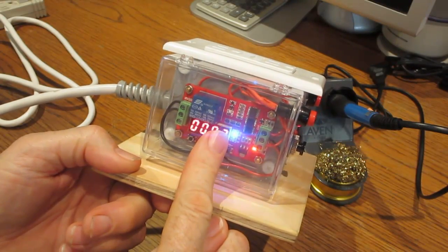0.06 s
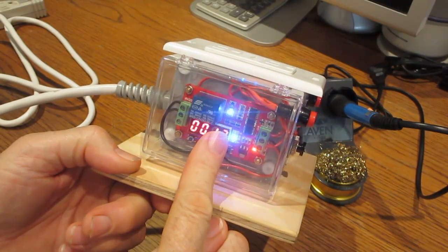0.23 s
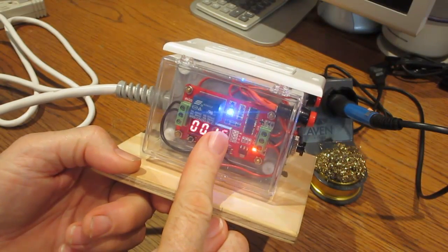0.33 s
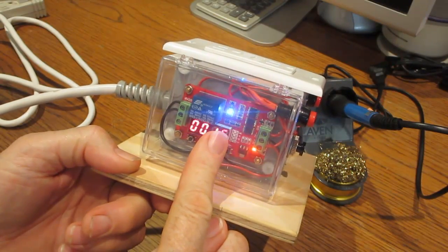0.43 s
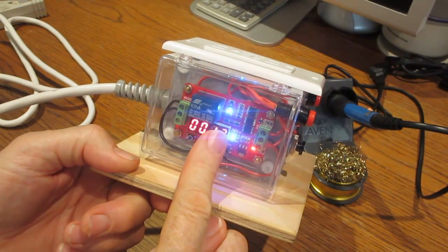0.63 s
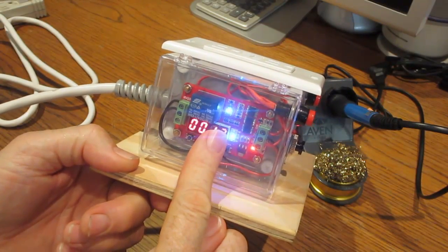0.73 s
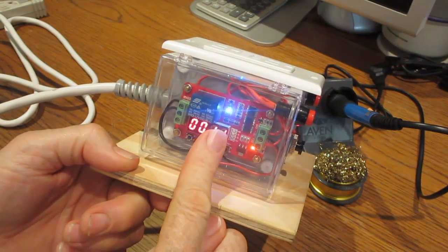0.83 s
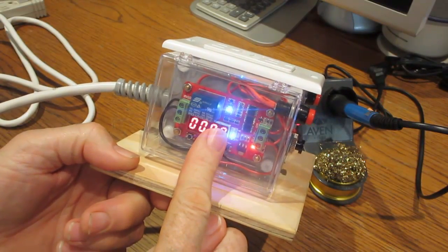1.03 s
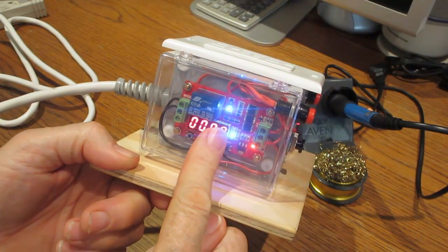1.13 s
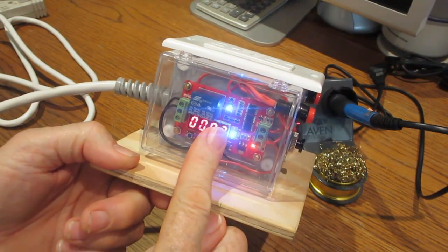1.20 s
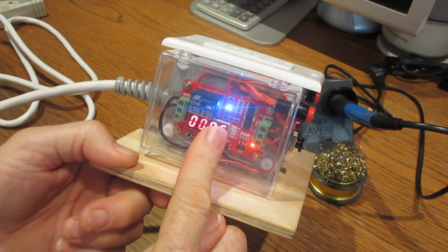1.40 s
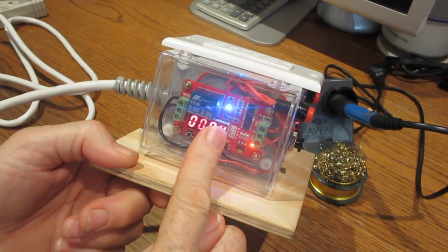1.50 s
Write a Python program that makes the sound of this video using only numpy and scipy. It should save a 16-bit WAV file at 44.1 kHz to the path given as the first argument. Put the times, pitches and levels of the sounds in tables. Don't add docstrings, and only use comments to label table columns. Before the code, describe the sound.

Single crisp relay click in a plastic box, close up, above quiet mains hum and fan air

```python
import sys
import numpy as np
from scipy import signal
from scipy.fft import rfft, irfft
from scipy.io import wavfile
from scipy.ndimage import uniform_filter1d

SR = 44100
rng = np.random.default_rng(int(sys.argv[2]) if len(sys.argv) > 2 else 0)


def voltage_ratio(level):
    return 10 ** (np.asarray(level, float) / 20)


def master(y):
    cut = np.clip(np.atleast_2d(y).T, -1, 1)
    pcm = np.round(cut * 32767)
    wavfile.write(sys.argv[1], SR, pcm.astype(np.int16))


N = 68355
OPPOSITE = np.array([[1], [-1]])


def level(x, db):
    return x * voltage_ratio(db) / np.sqrt(np.mean(x ** 2))


def band(x, hz, width_hz):
    centre = min(hz, 0.45 * SR)
    sharpness = max(hz / width_hz, 0.3)
    return signal.lfilter(*signal.iirpeak(centre, sharpness, fs=SR), x)


def coloured(shape):
    hz, db = np.array(shape).T
    f = np.maximum(np.fft.rfftfreq(N, 1 / SR), 1)
    gain = voltage_ratio(np.interp(np.log(f), np.log(hz), db))
    return irfft(rfft(rng.standard_normal(N)) * gain, N)


def walk(rate_hz):
    span = int(SR / rate_hz)
    smooth = uniform_filter1d(rng.standard_normal(N), span)
    return level(uniform_filter1d(smooth, span), 0)


def sides(db):
    return voltage_ratio(OPPOSITE * db / 2)


# (frequency [Hz], rms level [dB], wobble width [Hz])
FAN_TONES = [(134.5, -60, 2.7), (230, -58.5, 29.4), (259, -58, 4.2), (298.8, -59, 4.9), (604, -68.5, 3.9)]


def hum():
    t = np.arange(N) / SR
    mains_db = -48 + 0.84 * walk(7.3)
    out = voltage_ratio(mains_db) * np.sqrt(2) * np.sin(2 * np.pi * 120.0 * t)
    for hz, db, width_hz in FAN_TONES:
        sway = walk(width_hz) + 1j * walk(width_hz) + 0.3
        tone = (sway * np.exp(2j * np.pi * hz * t)).real
        out = out + level(tone, db)
    return out


# (frequency [Hz], level [dB per Hz])
AIR_COMMON = [(25, -6), (100, 2.5), (330, 0.5), (800, -8.5), (1250, -9), (1400, -13), (4200, -29.5),
              (10800, -40.5)]
# (frequency [Hz], level [dB per Hz])
AIR_SIDE = [(110, -54), (200, -13.5), (420, 0), (800, -7.5), (1220, 0), (1400, -9.5), (4200, -25),
            (10800, -35)]


def air():
    swell = voltage_ratio(2.33 / 2 * walk(16))
    common = level(coloured(AIR_COMMON), -50.5)
    side = level(coloured(AIR_SIDE), -56)
    return swell * (common + side * OPPOSITE)


# (time [s], level [dB], dullness [0-1, below 0 is brighter])
STRIKES = [
    (0.2207, 3, 0.11),
    (.2223, -10.5, 0),
    (.2230, -22.5, -0.2),
    (0.2254, -14, 0.07),
]
# (frequency [Hz], level [dB], t60 [s], left-right difference [dB], rise [ms])
PARTS = [(856, -1, 0.016, -0.5, 4.6), (1185, -3.5, 0.01, 0, 2.1), (1476, -8.5, 0.011, -0.5, 0.54),
         (2060, -0.5, 0.0061, -1, 0.82), (2380, 2, 0.0044, -1, 1.02), (2700, 2.5, 0.011, 0, 0.62),
         (3450, -10, 0.0099, -3, 0.35), (4750, -6, 0.0062, -5, 0.071), (5150, -11, 0.01, 4, 0.52),
         (5980, -11, 0.0082, 0, 0.36), (6630, -12.5, 0.0065, -4, 0.27), (8000, -14.5, 0.014, 3, 0.27),
         (8440, -14.5, 0.0068, 3, 0.2), (9870, -7.5, 0.0053, 1.5, 0.23)]


def relay():
    left_lag_s, pull_in_s = 0.00002, 0.0014
    t = np.arange(N) / SR
    ringing = np.zeros((2, N))
    near = slice(int(0.2 * SR), int(0.3 * SR))
    for strike_s, strike_db, dull in STRIKES:
        age = np.maximum(t[near] - strike_s - np.array([[left_lag_s], [0]]), 0)
        for k, (hz, part_db, t60, pan_db, rise_ms) in enumerate(PARTS):
            rise = 1 - np.exp(-age * 1000 / rise_ms)
            decay = np.exp(-np.log(1000) * age / t60)
            tilt_db = -16.0 * dull * np.log2(hz / 2500)
            gain = voltage_ratio(strike_db + part_db + tilt_db) * sides(pan_db)
            sign = -1 if k == 3 else 1
            ringing[:, near] += sign * gain * rise * decay * np.sin(2 * np.pi * hz * age)
    low_cut = signal.butter(3, 425, "high", fs=SR, output="sos")
    click = voltage_ratio(-9.5) * signal.sosfilt(low_cut, ringing)
    start = STRIKES[0][0]
    moving = (t > start - pull_in_s) * (t < start)
    pull = moving * band(rng.standard_normal(N), 5160, 7200)
    return click + voltage_ratio(-57) * pull


# (delay [s], level [dB], centre [Hz], width [Hz], left-right difference [dB])
ECHOES = [
    (.0062, -46, 1600, 1200, 2),
    (.0075, -21, 2520, 1190, -24),
    (.0085, -7, 850, 666, 3.5),
    (0.0124, -19.5, 5000, 900, 12.5),
    (0.0184, -47, 1470, 910, 2),
]
# (frequency [Hz], t60 [s], level [dB], width [share of frequency])
ROOM_BANDS = [(603, 0.4, -4.5, 0.22), (850, 0.15, -10, 0.32), (1545, 0.26, -5.5, 0.26),
              (2140, 0.27, -15.5, 0.23), (2650, 0.36, -27.5, 0.53), (3310, 0.19, -4.5, 0.22),
              (5140, 0.26, -7, 0.18), (5960, 0.17, -4, 0.078), (7080, 0.129, -8.5, 0.11),
              (8240, 0.14, -2.5, 0.14), (9600, 0.15, 2.5, 0.21)]


def room(dry):
    mono = dry.mean(axis=0)
    out = 0
    for delay_s, db, hz, width_hz, pan_db in ECHOES:
        delayed = np.roll(mono, int(delay_s * SR))
        out = out + voltage_ratio(db) * sides(pan_db) * band(delayed, hz, width_hz)
    size = int(0.4 * SR)
    t = np.arange(size) / SR
    onset = 1 - np.exp(-(t / 0.01) ** 2)
    tail = 0
    for hz, t60, db, share in ROOM_BANDS:
        noise = rng.standard_normal((2, size))
        mid, side = band(band(noise, hz, hz * share), hz, hz * share)
        fade = np.exp(-np.log(1000) * t / t60) * onset
        gain = voltage_ratio(db) * np.sqrt(1 / (hz * t60))
        tail = tail + gain * fade * (mid + voltage_ratio(-3) * side * OPPOSITE)
    return out + signal.fftconvolve(mono[None], tail, axes=1)[:, :N]


def scene():
    background = hum() + air()
    click = relay()
    return background + click + room(click)


def low_pass(x):
    return signal.sosfilt(signal.butter(12, 11280, fs=SR, output="sos"), x)


def record(dry):
    hiss = level(band(rng.standard_normal((2, N)), 6600, 3100), -74.5)
    top_cut = signal.ellip(10, 0.2, 70, 11050, fs=SR, output="sos")
    mix = signal.sosfilt(top_cut, dry + hiss)
    return low_pass(mix)


dry = scene()
out = record(dry)
master(out)
```